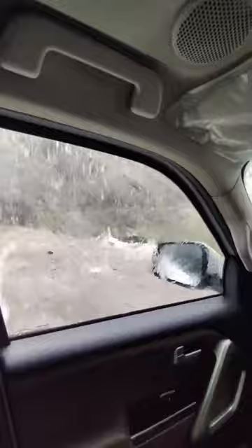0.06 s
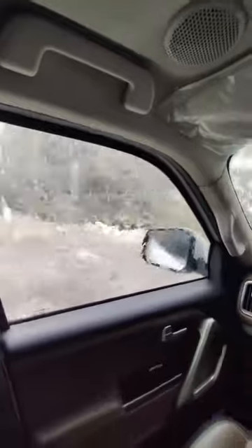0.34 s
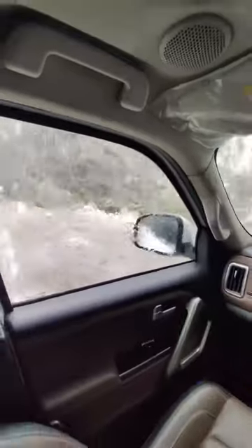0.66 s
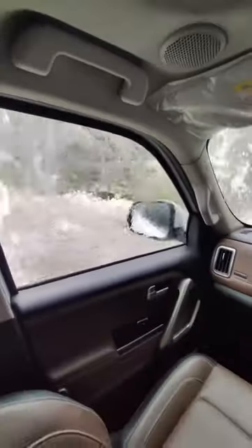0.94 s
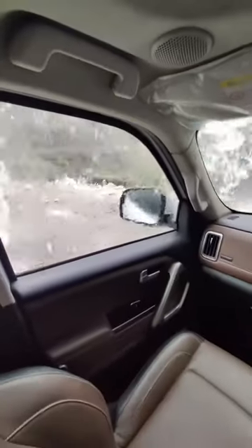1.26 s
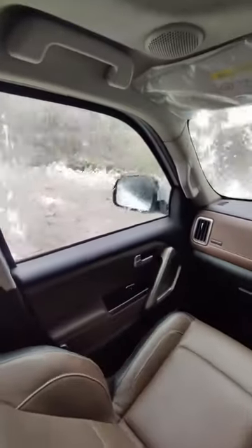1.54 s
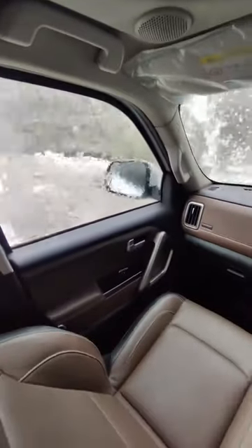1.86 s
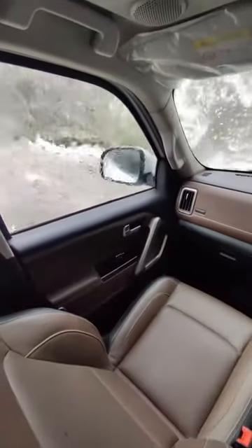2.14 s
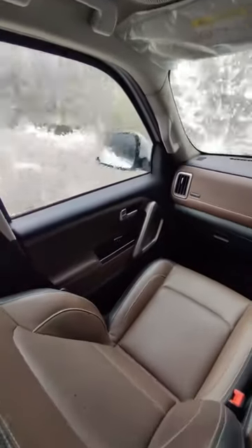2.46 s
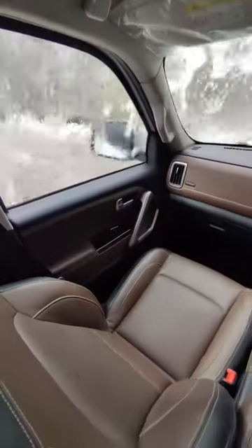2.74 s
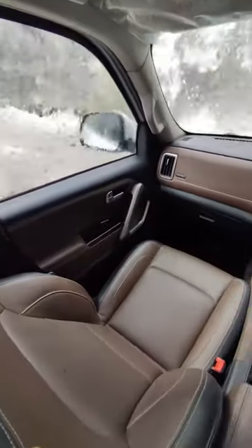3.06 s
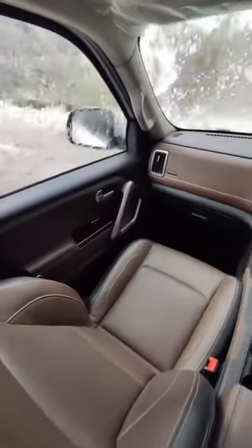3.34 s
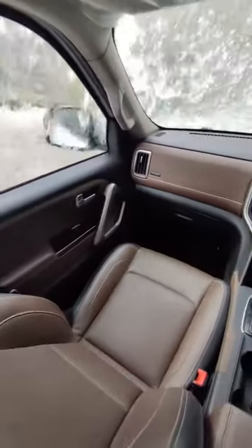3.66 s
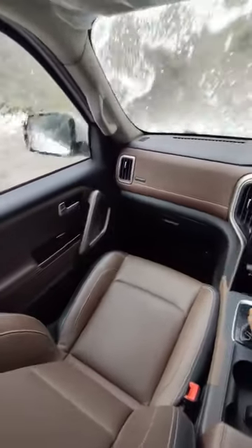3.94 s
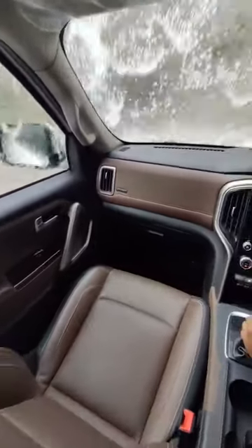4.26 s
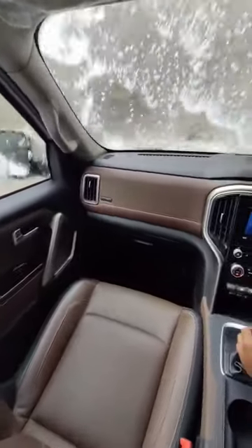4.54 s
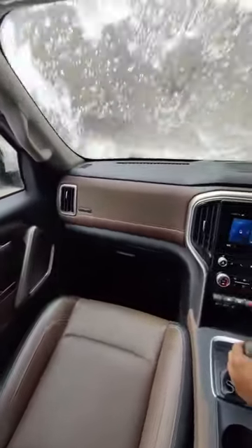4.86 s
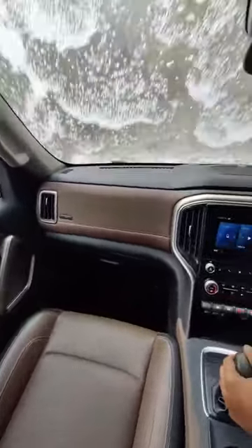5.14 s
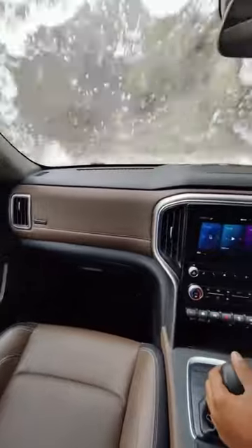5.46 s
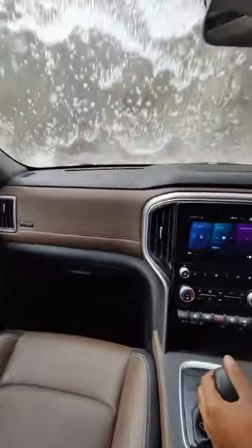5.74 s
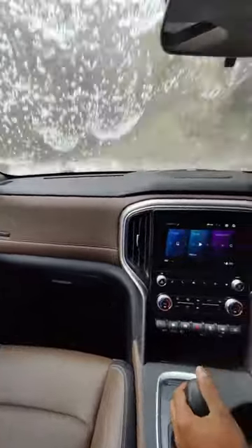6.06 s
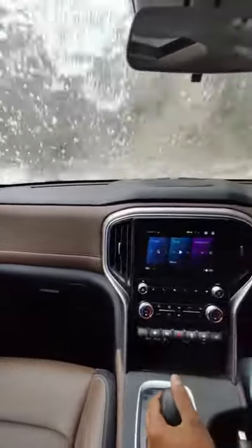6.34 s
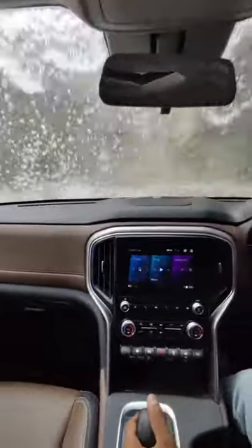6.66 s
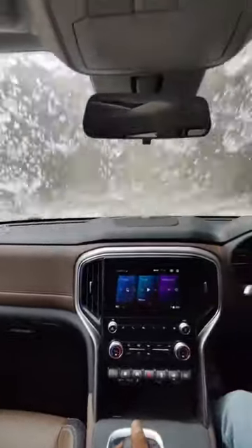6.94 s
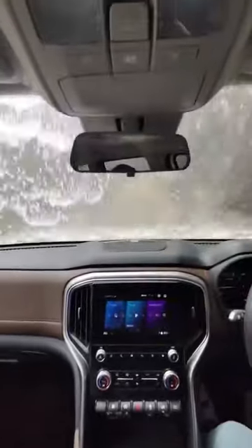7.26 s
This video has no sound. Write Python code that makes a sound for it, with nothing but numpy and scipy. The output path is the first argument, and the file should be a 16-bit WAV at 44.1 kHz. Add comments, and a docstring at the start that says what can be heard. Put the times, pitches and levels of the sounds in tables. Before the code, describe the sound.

From inside a closed car, falling water pounds the roof with a continuous deep drumming and scattered heavier thumps. Sharp splashes smack the windshield among pattering drops and hissing spray, surging and briefly easing. The body rumbles under the weight and the engine idles low beneath it. Near the end the patter rings a little more as the microphone turns toward the windshield.

```python
"""You hear a waterfall drumming and splashing on a car, from inside, with the engine idling.
Lumps of water boom on the roof, rattle the panels and shake the whole body. Big splashes slap the
windshield, while drops patter and spray fizzes on the glass. The stream keeps breaking off,
refilling and swelling into gushes. A limiter holds down the loudest peaks."""
import sys
import numpy as np
from scipy import signal
from scipy.fft import rfft, irfft, next_fast_len
from scipy.io import wavfile
from scipy.ndimage import uniform_filter1d, minimum_filter1d, map_coordinates

SR = 44100
rng = np.random.default_rng(int(sys.argv[2]) if len(sys.argv) > 2 else 0)


def inscribe(sig):
    """Save sig as 16-bit PCM at rate SR to the path in sys.argv[1].

    A 1-D sig is mono; a 2-D sig holds one channel per row.
    Samples are clipped to [-1, 1] before scaling.
    """
    pcm = np.round(np.clip(np.atleast_2d(sig).T, -1, 1) * 32767)
    wavfile.write(sys.argv[1], SR, pcm.astype(np.int16))


N = 321489

# How hard the water lands, before lulls and gushes: time_s, roof_db, panel_db, patter_db, spray_db
POUR_LEVELS = [(0.0, -16.5, -21, -34, -38), (0.5, -16, -20.5, -33.5, -38.5), (1.3, -17.5, -20, -33, -41.5),
               (1.9, -16, -20.5, -32, -39), (2.2, -17.5, -23, -34, -43.5), (2.55, -17.5, -21.5, -34, -41),
               (3.2, -16.5, -20.5, -33, -43), (3.95, -15, -21, -31.5, -42), (4.3, -18, -19, -33, -40),
               (4.6, -15, -20, -31, -39), (5.2, -19, -22, -35.5, -42.5), (5.6, -16.5, -19.5, -32.5, -37.5),
               (6.1, -18.5, -20, -35.5, -40), (6.8, -18.5, -21.5, -36, -39), (7.29, -16, -21, -34.5, -40)]
# Where the stream lands changes its tone: time_s, upper_roof_notes_db, coarse_drops_db
STREAM_TONE = [(0, 1, 3), (.7, 4.5, 0.5), (1.2, 0, 2.5), (2.1, 5.5, 0.5), (2.8, 1, 0), (3.5, 2.5, 1.5),
               (4.1, 3, 2.5), (4.6, 2, -1.5), (5.1, 1, 0.5), (5.6, -4, 0), (6.4, 0, -2), (7.29, -2, 0.5)]
# The stream breaks off for a moment: start_s, hold_s, depth_db
STREAM_LULLS = [(0.052, 0.14, 2.5), (0.247, 0.041, 5.5), (0.654, 0.14, 0), (0.93, 0.012, 9),
                (1.324, 0.11, 2.5), (2.056, 0.075, 5), (2.735, 0.056, 9), (3.426, 0.078, 4),
                (4.223, 0.046, 3), (5.307, 0.022, -1), (5.743, 0.11, 3.5), (6.128, 0.023, 3.5),
                (6.36, 0.027, 3.5), (6.496, 0.019, 5), (6.674, .02, 4.5), (6.816, 0.024, 4),
                (6.937, 0.086, 3)]
# The stream swells into a gush: start_s, length_s, panel_rise_db, spray_rise_db
STREAM_GUSHES = [(0.276, 0.09, 3, 6), (0.41, 0.14, 3, 0), (0.76, 0.18, 1, 2), (0.998, 0.21, 2, 3),
                 (1.228, 0.14, 1, 5), (1.732, 0.16, 0.5, 2.5), (1.842, 0.26, 3.5, 0.5),
                 (2.328, 0.21, 3.5, 2.5), (2.522, 0.12, 2, 3.5), (2.959, 0.17, 1, 4),
                 (3.293, 0.16, 0.5, 4.5), (4.34, 0.1, -1, 0), (4.496, 0.19, 2.5, 1), (4.9, 0.11, 1, 2.5),
                 (5.04, 0.084, 5.5, 4.5), (5.203, .08, -2, 2), (5.42, 0.091, 0.5, 3),
                 (5.565, 0.09, -1, 0.5), (5.854, 0.062, 2.5, 2), (5.954, 0.11, 0, 0.5),
                 (6.19, 0.13, 1.5, 0), (6.396, .1, 2, 3), (6.535, 0.088, 2.5, 3), (6.708, 0.099, 1.5, 2),
                 (6.875, 0.19, 2.5, -0.5), (7.076, .07, -2.5, 2), (7.176, 0.1, 2.5, 3)]
# Heavy lumps hit the roof; the spot decides which notes ring: start_s, lower_db, upper_db
ROOF_HITS = [(0.213, -8, -25), (0.313, -11, -8.5), (0.551, -6, -26), (0.7, -11.5, -20.5),
             (0.842, -21, -14.5), (1.15, -18.5, -12), (1.235, -18.5, -10.5), (1.335, -13, -16.5),
             (1.669, -12.5, -19.5), (1.772, -15, -13), (2.52, -12, -10.5), (2.687, -8.5, -13),
             (2.815, -12, -12), (2.922, -19, -11), (3.019, -13, -14.5), (3.11, -23, -9), (3.205, -21, -9.5),
             (3.36, -23, -10.5), (3.42, -12, -17), (3.59, -24, -9), (3.675, -15, -13), (3.806, -20, -13),
             (3.899, -13, -15), (4.01, -9.5, -11), (4.13, -22, -11), (4.401, -17, -16), (4.683, -10.5, -15),
             (4.909, -9, -16.5), (5.12, -7.5, -26), (5.24, -26, -12), (5.945, -7, -16), (6.18, -12, -23),
             (6.27, -6, -16), (6.954, -7, -15)]
# Big splashes hit the windshield: start_s, slap_db, thud_db, splash_db
WINDSHIELD_HITS = [(0.132, -27, -18, -33.5), (0.365, -14, -34, -40), (0.459, -24, -17.5, -33),
                   (0.5278, -18, -17.5, -35), (0.707, -16.5, -22, -39), (0.9117, -22, -13, -38),
                   (1.013, -22, -14.5, -46), (1.055, -26, -18, -37), (1.2254, -19, -15, -41),
                   (1.345, -32, -31, -31.5), (1.634, -14, -9, -37.5), (1.7504, -13.5, -15, -43),
                   (1.8404, -26.5, -6, -37), (1.893, -9, -15, -45), (1.973, -23.5, -14.5, -37),
                   (2.0858, -21.5, -11, -47), (2.1624, -30, -14, -45), (2.397, -22.5, -23, -30.5),
                   (2.45, -22.5, -26, -31.5), (2.467, -28, -20, -29), (2.572, -16, -28, -30),
                   (2.648, -21, -17, -32.5), (2.707, -15.5, -13, -41.5), (2.825, -24, -13.5, -45),
                   (2.899, -24.5, -25, -41), (3.114, -15, -11, -34), (3.531, -21.5, -13.5, -45),
                   (3.6678, -17, -12, -30), (3.728, -25.5, -19.5, -26.5), (3.799, -13.5, -13, -27.5),
                   (3.847, -21.5, -11, -34), (3.996, -19, -14.5, -35), (4.089, -14.5, -19, -32),
                   (4.306, -16, -12, -33), (4.366, -25, -20, -30), (4.5934, -18, -12.5, -28.5),
                   (4.8272, -25, -14.5, -35), (5.0298, -26, -16.5, -44), (5.0734, -36, -15, -34),
                   (5.21, -23, -19.5, -37), (5.297, -19, -13, -39), (5.6335, -33, -15.5, -30),
                   (5.973, -19, -13, -48), (6.108, -30, -29, -30.5), (6.3975, -18, -19, -36),
                   (6.4494, -30, -20, -33), (6.488, -18, -17, -41), (6.566, -26, -26, -33),
                   (6.765, -26, -21, -36), (7.15, -20, -18, -46)]
# How hard the car heaves under the water: time_s, level_db
BODY_HEAVE = [(0.0, -8.5), (0.3, -24), (0.6, -13), (0.78, -21.5), (1.35, -13), (1.58, -21.5), (2.12, -11),
              (2.3, -26), (2.6, -9.5), (2.8, -21), (3.8, -20), (4.2, -15), (5.2, -17), (5.7, -12.5),
              (5.87, -19.5), (6.5, -13.5), (7.29, -19)]

# The notes each part rings at when struck: pitch_hz, width_hz, level_db
ROOF_NOTES = [(76.7, 19, -5.5), (109.1, 17.9, 1.5), (132, 32, -2), (192, 19.5, -1.5), (214.4, 23.1, -1.5),
              (250.4, 37.3, -8.5)]  # three lower, then three upper
PANEL_NOTES = [(346.3, 36.4, 2.5), (401, 47, 2), (515.6, 71, 1), (576, 38.6, 3.5), (665, 83, 0.5),
               (825, 190, -5.5)]  # the windshield and smaller panels
WINDSHIELD_NOTES = [(274, 56, 0), (1210, 100, 3), (1500, 170, -9), (3520, 400, 0)]  # one boom, two rings, one sizzle
BODY_NOTES = [(30.3, 14, 1.5), (39.6, 22.8, -4.5)]  # the whole body and the air inside

# The tone of each water sound, from bass to treble: pitch_hz, level_db
SLAP_TONE = [(500, -18), (1050, 12.5), (1500, 5), (2200, -18.5), (3500, -39), (7000, -45.5)]
SPLASH_TONE = [(1000, -25), (2100, 2.5), (3200, 4.5), (4200, -0.5), (6500, -5), (8000, -14.5),
               (9500, -44.5), (12000, -62.5)]
CRACK_TONE = [(600, -19), (1200, 4), (2000, -0.5), (3200, -8), (6000, -13), (8000, -27), (10000, -50)]
PATTER_TONE = [(500, -30), (850, 1.5), (1080, 3.5), (1250, -3.2), (1520, -5.5), (1750, -9.5), (2100, -14),
               (3500, -19.5), (7000, -25.5), (12000, -59)]
SPRAY_TONE = [(900, -22.5), (1900, -6), (2150, -1), (2500, -2), (2950, -0.9), (3500, -2.5), (4000, -2.5),
              (4300, -1.5), (4700, -3), (6200, -3), (7200, -12), (8200, -15.5), (9500, -25), (12000, -26.5),
              (15000, -34)]

# The microphones swing from side window to windshield: time_s, left_minus_right_db, windshield_db
MIC_FACING = [(0, 1, -10), (1.8, 1.24, -10.5), (4.6, 0.5, -16.5), (5.3, 0.8, -3.5), (5.8, -0.5, -7),
              (7.29, 1, -8)]
# How alike left and right sound: pitch_hz, likeness (0 to 1)
STEREO_LIKENESS = [(30, .976), (130, .97), (240, .95), (310, .8), (360, .9), (550, .8), (700, .58),
                   (850, .52), (1100, .3), (1400, .25), (1900, 0)]
# Which side is louder: pitch_hz, left_minus_right_db
STEREO_BALANCE = [(30, -0.5), (120, -0.5), (165, 0), (230, 0), (320, 0.5), (450, -0.1), (750, 0),
                  (1100, 0.5), (3000, 0.5), (6000, 0), (7600, 5.5), (12000, 3.5)]


def roof_drumming(level_db):
    """Big soft lumps of water keep the roof's metal sheet ringing."""
    upper_db, _ = curves(STREAM_TONE)
    lumps = impacts(per_s=320, scatter_db=-2, life_s=0.0058)
    lower = in_stereo(lumps, ringing(ROOF_NOTES[:3], low_hz=56.4, high_hz=207))
    upper = in_stereo(lumps, ringing(ROOF_NOTES[3:], low_hz=176, high_hz=382))
    roof = lower - amp(upper_db) * upper  # neighbouring notes swing opposite ways
    return amp(level_db + 0.37) * steady(roof, span_s=0.069)


def roof_thumps():
    """Single heavy lumps of water make the roof boom."""
    start_s, lower_db, upper_db = np.transpose(ROOF_HITS)
    lower = ringing(ROOF_NOTES[:3], low_hz=101, high_hz=140)
    upper = ringing(ROOF_NOTES[3:], low_hz=179, high_hz=248)
    return (strikes(start_s, lower_db, lower, rise_s=0.0057, life_s=0.035)
            + strikes(start_s, upper_db, upper, rise_s=0.008, life_s=0.036))


def panel_rattle(level_db, windshield_db):
    """Smaller, quicker lumps rattle the panels and make the windshield boom."""
    lumps = impacts(per_s=880, scatter_db=0.5, life_s=0.003)
    boom = unit(in_stereo(lumps, ringing(WINDSHIELD_NOTES[:1], low_hz=226, high_hz=330)))
    panels = unit(in_stereo(lumps, ringing(PANEL_NOTES, low_hz=272, high_hz=920)))
    return amp(level_db + 0.46) * steady(panels - amp(windshield_db) * boom, span_s=0.052)


def windshield_splashes(ring_s=0.012):
    """Each mass of water cracks and slaps on the glass, thuds in the panels and bursts apart."""
    start_s, slap_db, thud_db, splash_db = np.transpose(WINDSHIELD_HITS)
    panels = ringing(PANEL_NOTES, low_hz=200, high_hz=990)
    thuds = strikes(start_s, thud_db + 0.5, panels, rise_s=0.00055, life_s=ring_s)
    slaps = strikes(start_s, slap_db - 6.5, tone(SLAP_TONE), rise_s=0.00021, life_s=ring_s)
    splashes = strikes(start_s, splash_db, tone(SPLASH_TONE), rise_s=0.0003, life_s=ring_s)
    crack_db = (slap_db + splash_db) / 2
    cracks = strikes(start_s, crack_db, tone(CRACK_TONE), rise_s=0.0002, life_s=0.003)
    return thuds + slaps + splashes + cracks


def drop_patter(level_db, windshield_db):
    """Drops patter on the glass and set the windshield ringing."""
    drops = cabin_echoes(impacts(per_s=700, scatter_db=1, life_s=0.0073), echo_db=-3)
    patter = steady(in_stereo(drops, tone(PATTER_TONE)), span_s=0.1)
    taps = impacts(per_s=290, scatter_db=6, life_s=0.0031)
    ring = in_stereo(taps, ringing(WINDSHIELD_NOTES[1:3], low_hz=1100, high_hz=1750))
    return amp(level_db + 3.5) * (patter + amp(windshield_db - 4.5) * steady(ring, span_s=0.1))


def spray_fizz(level_db, windshield_db, wash_db=-46):
    """The sheet of water bursts into mist, ticks and bubbles, and sizzles on the windshield."""
    _, coarse_db = curves(STREAM_TONE)
    mist = unit(impacts(per_s=410, scatter_db=3.5, life_s=0.024))
    ticks = amp(-3) * unit(impacts(per_s=150, scatter_db=4.5, life_s=0.0016))
    fizz = cabin_echoes(mist + ticks + amp(-6) * bubbles(), echo_db=-6.5)
    spray = in_stereo(fizz, tone(SPRAY_TONE))
    coarse = filtered(spray, lambda hz: 1 / (1 + (hz / 3000) ** 8))  # bigger drops sound lower
    spray = unit(spray + (amp(coarse_db) - 1) * coarse)
    droplets = impacts(per_s=330, scatter_db=5, life_s=0.0046)
    sizzle = unit(in_stereo(droplets, ringing(WINDSHIELD_NOTES[3:], low_hz=2700, high_hz=3900)))
    flow = np.hypot(amp(level_db + 1.5), amp(wash_db))  # the distant waterfall's hiss never stops
    return flow * steady(spray + amp(windshield_db - 3) * sizzle, span_s=0.087)


def bubbles(count=4000, low_hz=1700, high_hz=8000, scatter_db=6, life_s=0.008):
    """Tiny bubbles each ring briefly at their own pitch, somewhere between left and right."""
    when, pitch, life, size, pan, left_phase, right_phase = rng.random((7, count, 1))
    t = np.arange(SR // 60) / SR
    hz = low_hz + (high_hz - low_hz) * pitch
    fade = amp(scatter_db * size ** 3) * np.exp(-t / (life_s * (0.5 + life))) * (1 - t / t[-1])
    samples = ((when * N).astype(int) + np.arange(len(t))).ravel()
    sides = []
    for share, phase in [(pan, left_phase), (1 - pan, right_phase)]:
        pings = np.sqrt(share) * fade * np.sin(2 * np.pi * (hz * t + phase))
        sides.append(np.bincount(samples, pings.ravel(), N)[:N])
    return unit(np.array(sides))


def body_shake():
    """The weight of the water shakes the whole car in a deep, uneven rumble."""
    heave_db, = curves(BODY_HEAVE)
    blows = impacts(per_s=180, scatter_db=-4.5, life_s=0.0039)
    shake = in_stereo(blows, ringing(BODY_NOTES, low_hz=28, high_hz=75))
    return amp(heave_db - 2) * steady(shake, span_s=0.23)


def engine_hum(firing_hz=27.63, level_db=-24, overtone_db=-12):
    """The idling engine hums unsteadily at its firing rate, with a weak tone four times as high."""
    phase = 2 * np.pi * np.cumsum(firing_hz * (1 + 0.0216 * wobble(per_s=2.5))) / SR
    return amp(level_db) * unit(np.sin(phase) + amp(overtone_db) * np.sin(4 * phase))


def lulls(break_s=0.011, refill_s=0.092):
    """How many dB the flow drops: the stream tears quickly and closes more slowly."""
    t = np.arange(N) / SR
    return sum(depth_db * np.interp(t, start_s + np.cumsum([0, break_s, hold_s, refill_s]), [0, 1, 1, 0])
               for start_s, hold_s, depth_db in STREAM_LULLS)


def gushes():
    """How many dB the panels and the spray rise: each gush swells and ebbs in one arch."""
    t = np.arange(N) / SR
    start_s, length_s, panel_db, spray_db = np.transpose(STREAM_GUSHES)
    arches = np.sin(np.pi * np.clip((t - start_s[:, None]) / length_s[:, None], 0, 1))
    return panel_db @ arches, spray_db @ arches


def impacts(per_s, scatter_db, life_s):
    """Two noises made of random hits of mixed size, each a sharp burst that dies away."""
    lands = rng.random(N) < per_s / SR
    size = amp(scatter_db * np.clip(rng.standard_normal(N), -2, 2))
    energy = signal.lfilter([1], [1, -np.exp(-2 / (life_s * SR))], lands * size ** 2)
    return np.sqrt(energy) * rng.standard_normal((2, N))


def strikes(start_s, level_db, response, rise_s, life_s):
    """One burst of filtered noise for each blow, rising quickly and dying away."""
    t = np.arange(SR // 8) / SR
    blows = np.bincount((start_s * SR).astype(int), amp(level_db), N)[:N]
    loudness = signal.oaconvolve(blows, np.exp(-t / life_s) * (1 - np.exp(-t / rise_s)))[:N]
    return loudness * steady(in_stereo(rng.standard_normal((2, N)), response), span_s=0.0079)


def ringing(notes, low_hz, high_hz):
    """A filter that rings like a panel at its notes and fades steeply outside the given range."""
    def response(hz):
        ring = sum((-1) ** k * amp(db) * 1j * hz * width / (pitch ** 2 - hz ** 2 + 1j * hz * width)
                   for k, (pitch, width, db) in enumerate(notes))
        return ring / np.sqrt((1 + (low_hz / (hz + 1)) ** 8) * (1 + (hz / high_hz) ** 8))
    return response


def cabin_echoes(x, echo_db, decay_s=0.008, patterns=8):
    """Windows and trim send back quick echoes, whose pattern drifts as the microphones move."""
    t = np.arange(SR // 40) / SR
    tails = rng.standard_normal((patterns, 2, len(t))) * np.exp(-t / decay_s)
    tails /= np.linalg.norm(tails, axis=2, keepdims=True)
    place = np.linspace(0, patterns - 1, N)
    echoes = 0
    for k, tail in enumerate(tails):
        nearness = np.sqrt(np.maximum(0, 1 - np.abs(place - k)))
        echoes += signal.oaconvolve(x * nearness, tail, axes=1)[:, :N]
    return x + amp(echo_db) * echoes


def in_stereo(pair, response, left_lead_s=0.00024):
    """Filter two noises into left and right: alike in the bass, unrelated in the treble."""
    size = next_fast_len(N + SR // 2)
    hz = np.fft.rfftfreq(size, 1 / SR)
    shared, apart = rfft(pair, size) * response(hz)
    spread = np.arccos(np.clip(at_pitch(STEREO_LIKENESS, hz), -1, 1)) / 2
    side = np.array([[1], [-1]])
    sides = shared * np.cos(spread) + side * apart * np.sin(spread)
    balance = amp(side * at_pitch(STEREO_BALANCE, hz) / 2)
    time_shift = np.exp(1j * np.pi * hz * side * left_lead_s)
    return irfft(sides * balance * time_shift, size)[:, :N]


def steady(x, span_s):
    """Even out the level to about 1, keeping flickers shorter than span_s."""
    size = int(span_s * SR) + 1
    power = uniform_filter1d(uniform_filter1d(np.mean(x ** 2, axis=0), size), size)
    return x / np.sqrt(np.abs(power) + 1e-20)


def filtered(x, response):
    """Scale each pitch in x by response(hz)."""
    size = next_fast_len(N + SR // 2)
    return irfft(rfft(x, size) * response(np.fft.rfftfreq(size, 1 / SR)), size)[..., :N]


def tone(table):
    """A filter that follows a tone table."""
    return lambda hz: amp(at_pitch(table, hz))


def at_pitch(table, hz):
    """Read between a table's rows on a log pitch scale."""
    pitches_hz, values = np.transpose(table)
    return np.interp(np.log(hz + 1), np.log(pitches_hz + 1), values)


def curves(table):
    """One value per sample for each column after the time."""
    time_s, *columns = np.transpose(table)
    return [np.interp(np.arange(N) / SR, time_s, column) for column in columns]


def wobble(per_s):
    """A smooth curve through per_s random points a second."""
    return map_coordinates(rng.standard_normal(400), [np.arange(N) * per_s / SR], mode="wrap")


def amp(db):
    """Turn decibels into a multiplier."""
    return 10 ** (np.asarray(db) / 20)


def unit(x):
    """Scale to an average (rms) level of 1."""
    return x / np.sqrt(np.mean(x ** 2) + 1e-20)


def scene():
    """Water on metal and glass over the engine's hum; one uneven stream feeds roof, panels and glass."""
    roof_db, panel_db, patter_db, spray_db = curves(POUR_LEVELS)
    balance_db, windshield_db = curves(MIC_FACING)
    lull_db = lulls()
    panel_gush_db, spray_gush_db = gushes()
    clumps_db = 0.5 * wobble(per_s=24)  # the water arrives in uneven clumps
    roof_db += clumps_db - 0.24 * lull_db
    panel_db += clumps_db - 0.52 * lull_db + panel_gush_db + 0.7 * wobble(per_s=12)
    patter_db += clumps_db - 0.49 * lull_db + 0.9 * wobble(per_s=18)
    patter_db += 0.27 * (panel_gush_db + spray_gush_db)
    spray_db += clumps_db - lull_db + spray_gush_db + 0.9 * wobble(per_s=31)
    metal = roof_drumming(roof_db) + roof_thumps() + panel_rattle(panel_db, windshield_db)
    glass = windshield_splashes() + drop_patter(patter_db, windshield_db)
    glass += spray_fizz(spray_db, windshield_db)
    inside = metal + glass + body_shake() + engine_hum()
    return inside * amp(np.array([balance_db, -balance_db]) / 2)


def record(dry, ceiling=0.86, top_hz=15385):
    """A fast limiter holds down the peaks, and the highest treble is cut off."""
    needed = np.minimum(1, ceiling / (np.abs(dry).max(axis=0) + 1e-9))
    gain = uniform_filter1d(minimum_filter1d(needed, size=400), size=400)
    end_fades = signal.windows.tukey(N, 0.0005)
    return filtered(dry * gain * end_fades, lambda hz: hz < top_hz)


dry = scene()
out = record(dry)
inscribe(out)
```